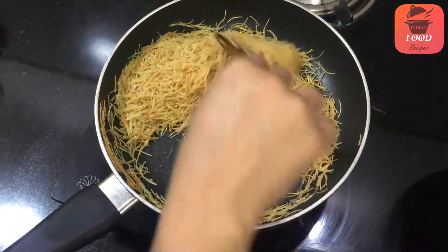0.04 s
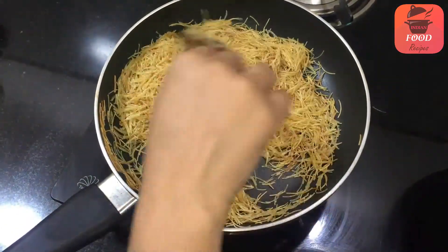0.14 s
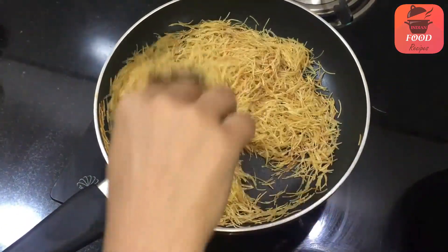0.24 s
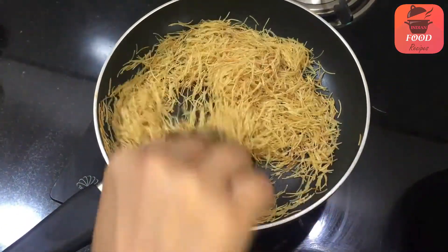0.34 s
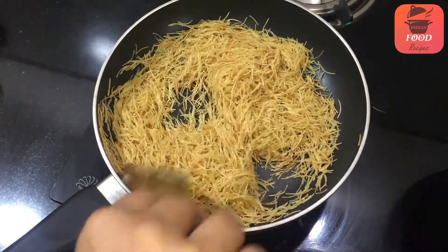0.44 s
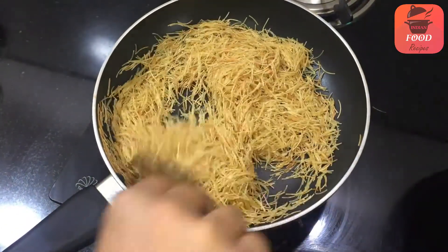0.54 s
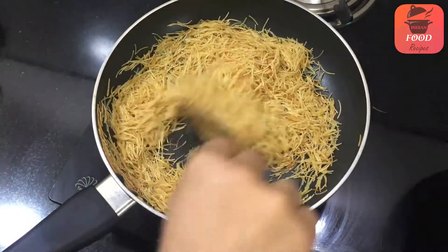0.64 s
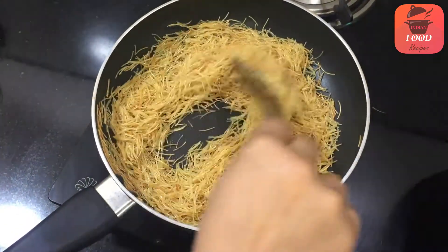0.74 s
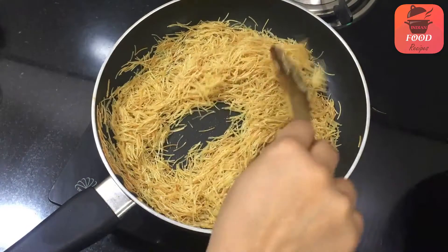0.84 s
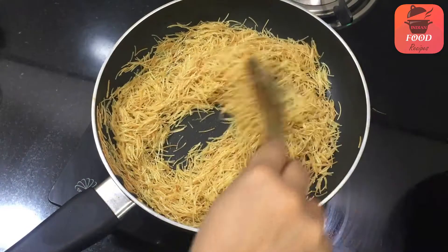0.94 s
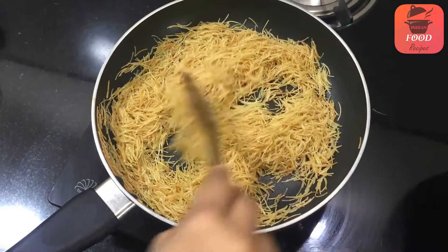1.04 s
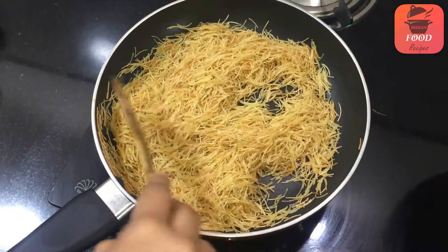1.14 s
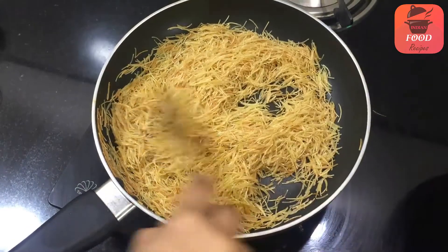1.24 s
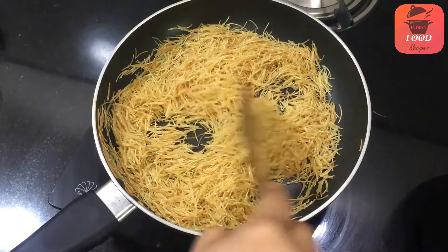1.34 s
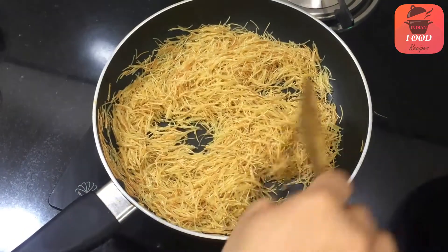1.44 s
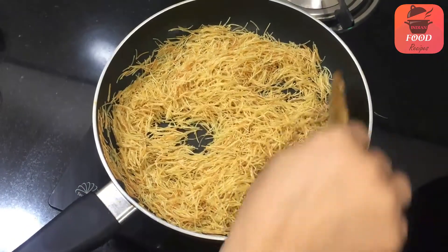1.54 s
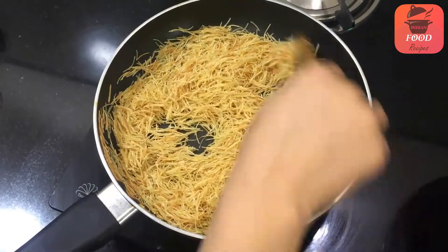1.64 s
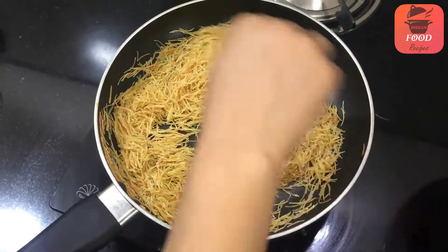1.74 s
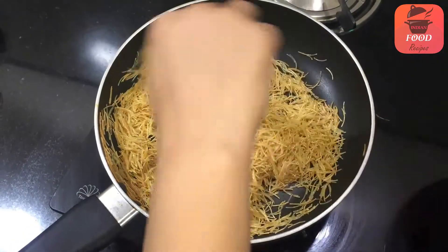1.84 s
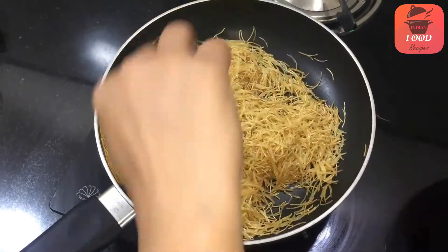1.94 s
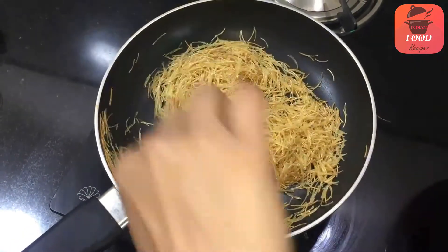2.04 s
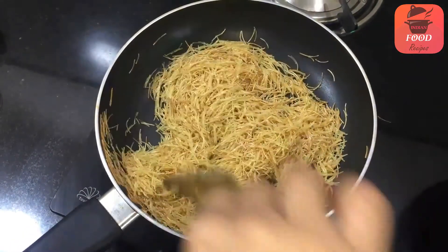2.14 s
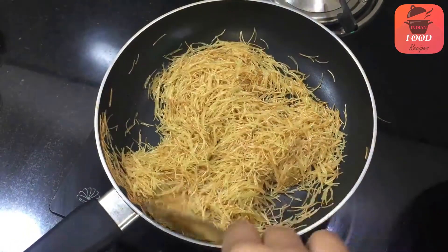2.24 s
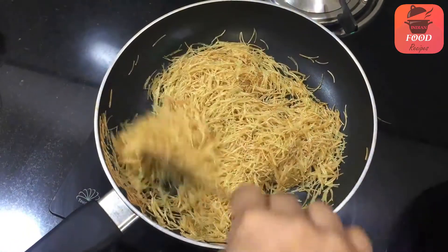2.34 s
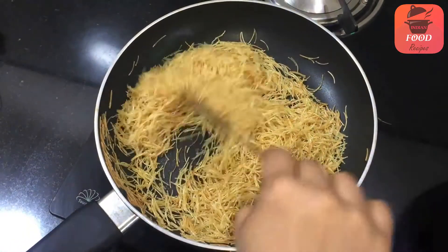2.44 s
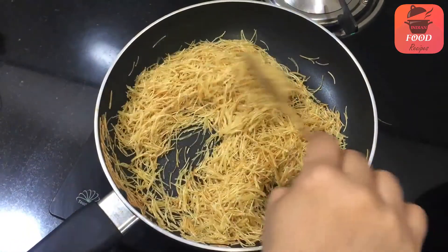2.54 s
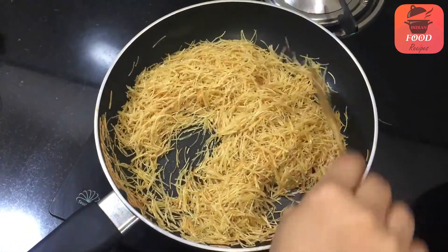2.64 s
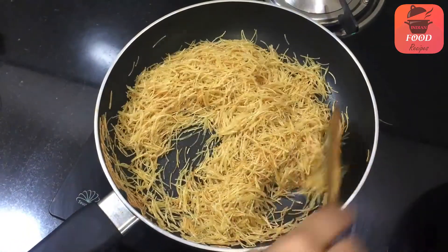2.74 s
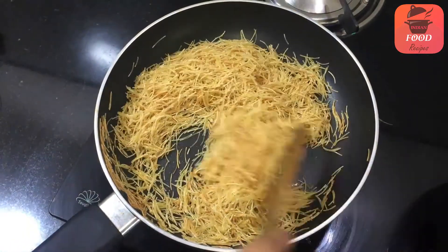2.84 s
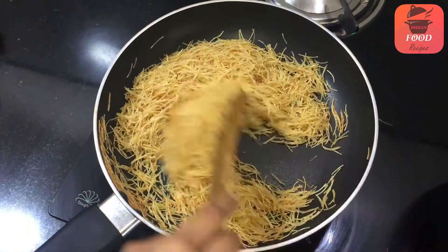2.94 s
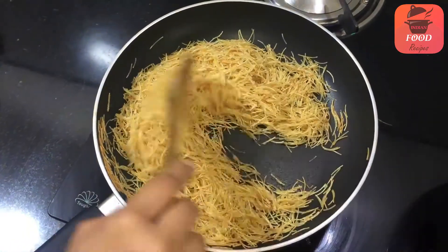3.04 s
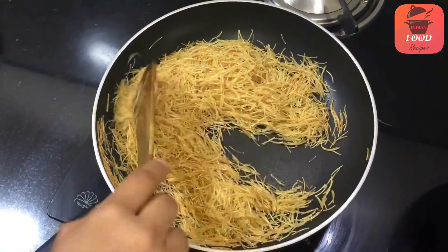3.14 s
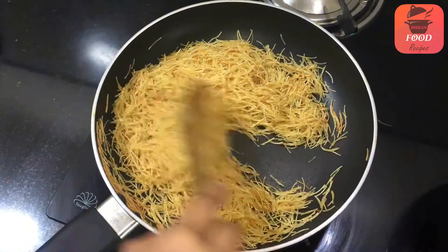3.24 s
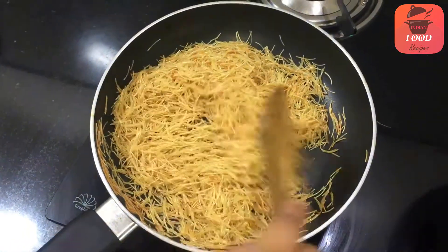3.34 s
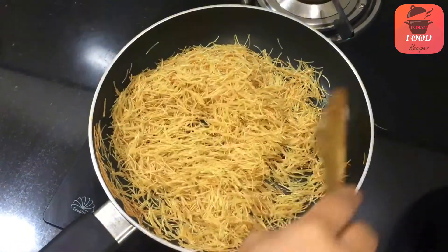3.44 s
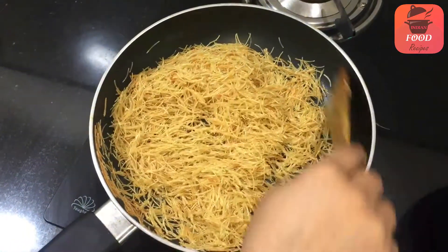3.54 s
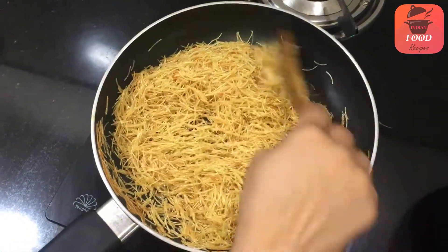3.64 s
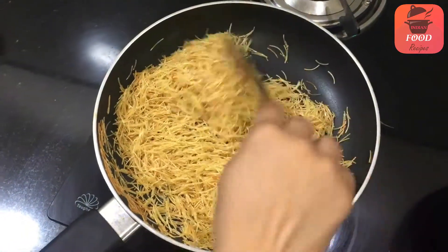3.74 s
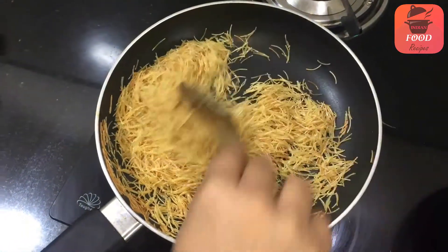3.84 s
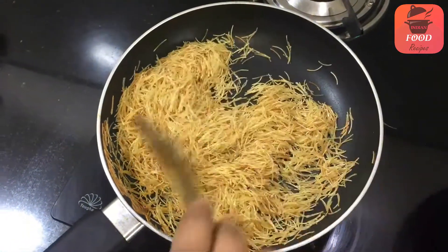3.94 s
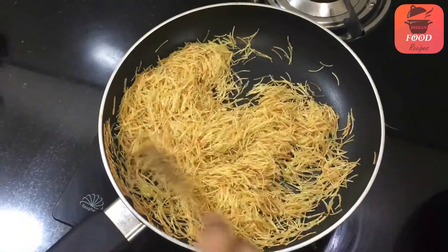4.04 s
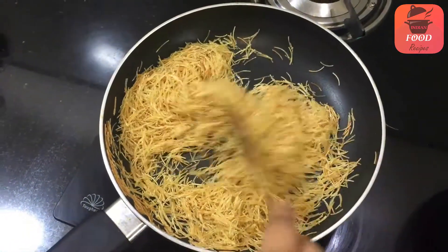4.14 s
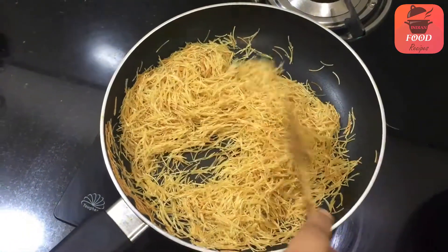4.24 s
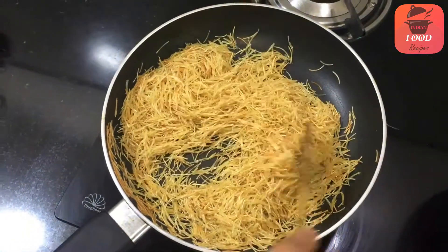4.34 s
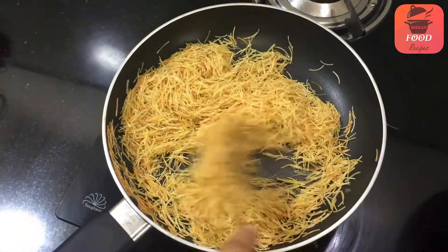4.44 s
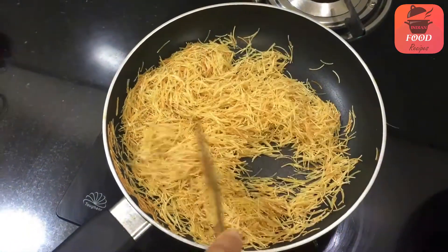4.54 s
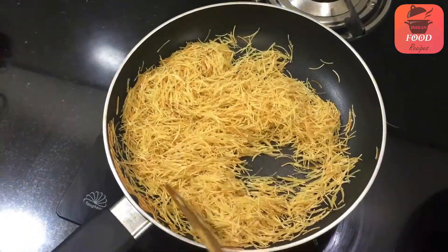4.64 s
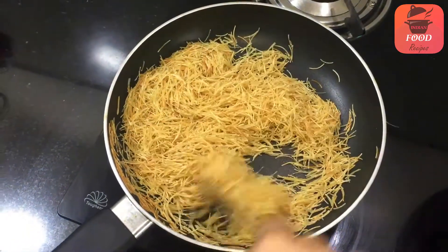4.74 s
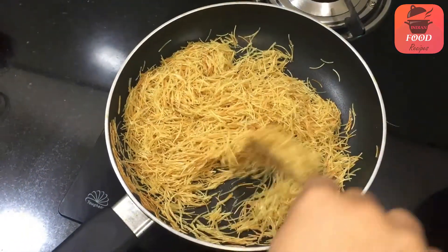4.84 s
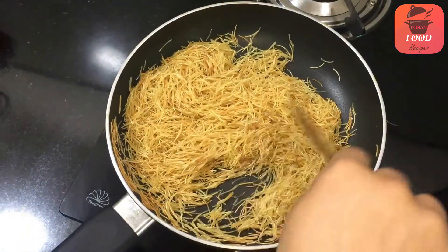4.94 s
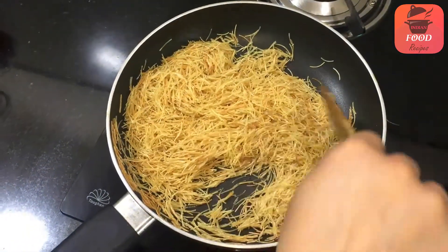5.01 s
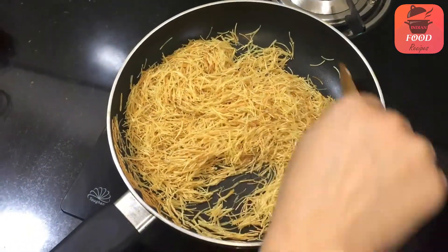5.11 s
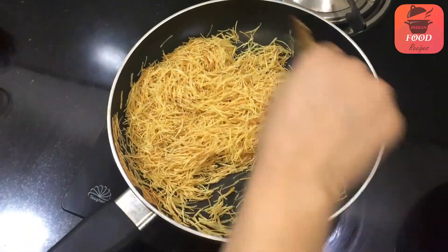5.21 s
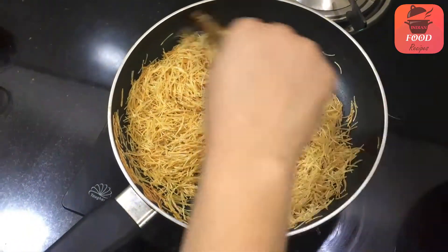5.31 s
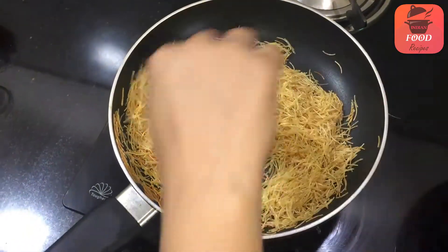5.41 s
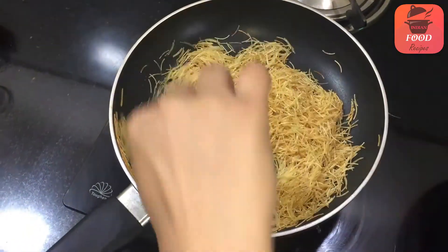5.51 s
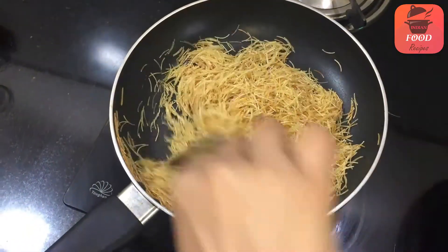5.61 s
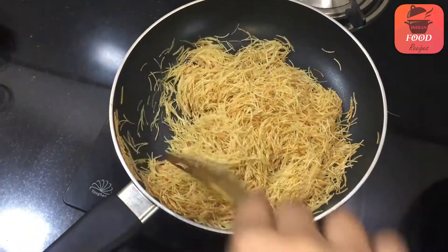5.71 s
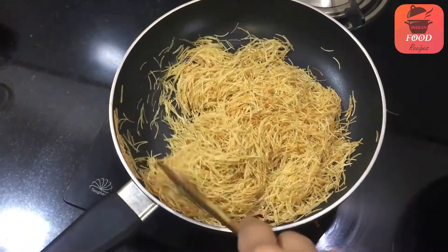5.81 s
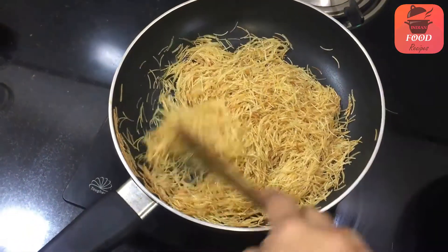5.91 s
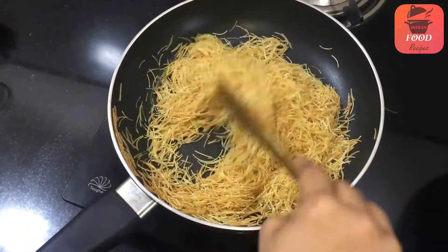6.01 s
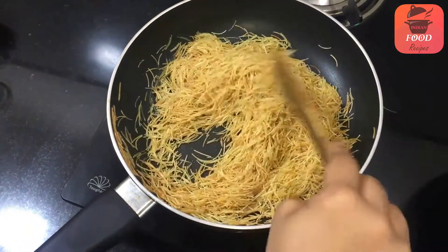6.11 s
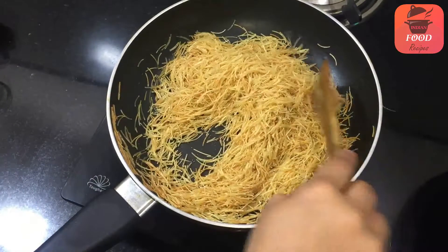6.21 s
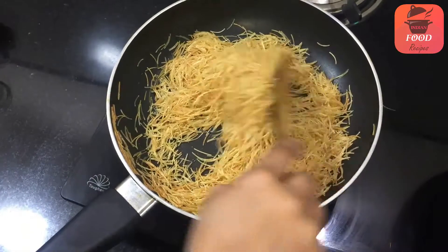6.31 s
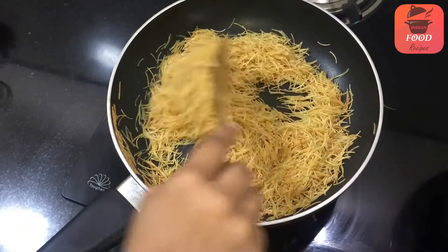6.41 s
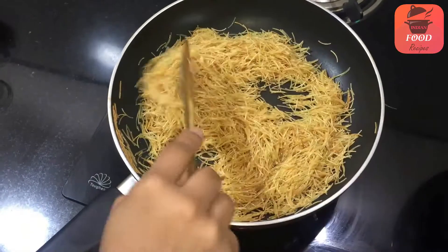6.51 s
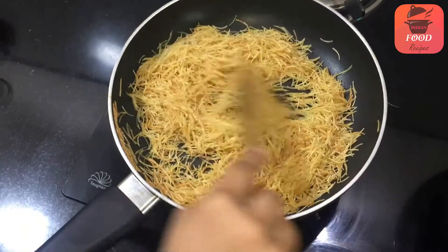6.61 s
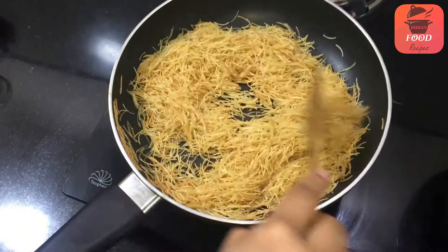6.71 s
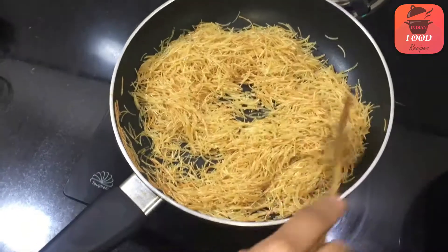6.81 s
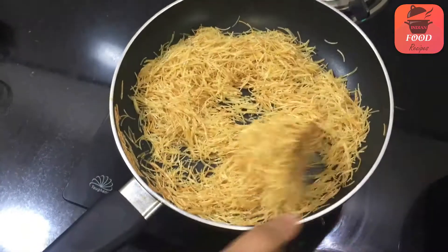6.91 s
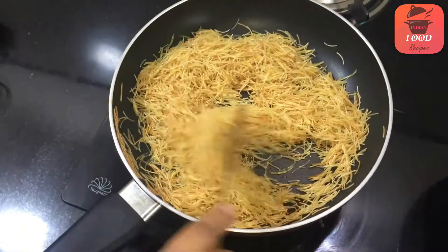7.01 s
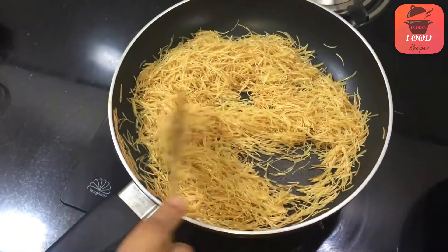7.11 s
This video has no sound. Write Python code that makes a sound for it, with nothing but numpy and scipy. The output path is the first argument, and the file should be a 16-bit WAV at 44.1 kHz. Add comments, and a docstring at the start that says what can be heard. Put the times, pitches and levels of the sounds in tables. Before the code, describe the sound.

A wooden spatula stirs dry, brittle strands in a metal pan with quick gritty scrapes, crisp rustles and occasional hollow knocks in a small kitchen.

```python
"""A faint scrape dies away, then strands crunch and a push swells: a wooden spatula stirs dry strands in a pan.
Each push filters random slips, snaps, skids and ticks through resonances of pan and blade; crunches are
bursts of snaps. Knocks excite decaying pan modes, with echoes and a rattle on the stand; rocking adds a thrum.
A short diffuse tail, steady air and a low uneven rumble place the nearly mono sound in a small kitchen."""
import sys
import numpy as np
from scipy import signal
from scipy.fft import rfft, irfft
from scipy.io import wavfile

SR = 44100
rng = np.random.default_rng(int(sys.argv[2]) if len(sys.argv) > 2 else 0)


def to_wav(sig):
    """Store sig (one row per channel, or 1-D mono) as 16-bit WAV at the path in sys.argv[1].

    Samples outside -1..1 are clipped; the rate is SR.
    """
    pcm = np.clip(np.atleast_2d(sig), -1, 1) * 32767
    pcm = np.round(pcm).astype(np.int16)
    wavfile.write(sys.argv[1], SR, pcm.T)  # frames by channels


N = 315756  # samples
TAPS = 8192  # length of the grid on which filters are designed
TIME = np.arange(N) / SR  # s
HZ = np.fft.rfftfreq(TAPS, 1 / SR)

# Spectrum of the steady kitchen air. Each row: frequency in Hz, gain in dB.
AIR_SPECTRUM = [(20, -19), (50, -10.5), (90, -2.5), (150, -14), (300, -5.5), (550, -19.5), (900, -10.5),
                (1400, -16), (1900, -26), (4000, -29), (8000, -27.5), (16000, -50)]
# Low rumble of the stove top. Each row: time in seconds, level in dB.
RUMBLE_LEVEL = [(0, -74), (0.6, -76), (0.8, -53), (1.7, -54.5), (2.2, -72), (4.0, -69), (4.6, -58),
                (5.2, -78), (5.8, -64), (6.05, -49.5), (6.35, -50.5), (6.7, -49.5), (7.16, -55)]
# Spectrum of that rumble. Each row: frequency in Hz, gain in dB.
RUMBLE_SPECTRUM = [(20, -40), (36, -19), (51, 8.5), (68, -3.5), (110, -19), (250, -42.5)]
# Decay of the kitchen's diffuse tail. Each row: frequency in Hz, time to -60 dB in seconds.
KITCHEN_DECAY = [(100, 0.34), (400, 0.42), (1500, 0.26), (5000, 0.14), (14000, 0.16)]
# Echoes from the stove top and the wall behind. Each row: mean delay in seconds, gain as a factor.
ECHOES = [(.0042, 0.49), (.0078, -0.27), (0.0126, .3), (.02, -0.1)]

# Bending modes of the pan. Each row: mean frequency in Hz, height over the dead thud in dB (before the
# ring setting of each knock), time to -60 dB in seconds.
PAN_MODES = [(194, 7.5, 0.23), (274, 16, .25), (320, 18, 0.25), (362.5, 9, 0.12), (405, 8.5, .11),
             (477, 17.5, 0.22), (519.5, 5, .12), (574, 11.5, 0.18), (652, 6.5, 0.09), (711, 12, 0.2),
             (731, 13, .22), (777, 6.5, 0.14), (876, 10.5, 0.14), (955, 5, 0.19), (1075, 3.5, 0.12),
             (1258, 4, 0.09), (1340, 7, .14), (1438, 6.5, 0.12), (1626, 4, 0.08), (1825, 5.5, 0.15),
             (2120, 5, 0.08), (2510, 5, 0.09), (2790, 5, .1)]
# Resonances of pan and blade under rubbing. Each row: frequency in Hz, width in Hz, lift in dB
# (each source takes its own share of the lift).
BODY_RESONANCES = [(272.5, 49, 7), (311, 34, 7.5), (734.5, 63, 7), (878, 55, 6.5), (948, 71, 7),
                   (1197, 25, -2), (1329, 85, 13), (1464, 93, 8), (1972, 30, 7.5), (2100, 55, 8.5),
                   (2760, 64, 5), (3170, 110, 9), (3480, 148, 9), (4184, 81, 8.5), (4555, 125, 12.5),
                   (5243, 77, 10.5), (5420, 126, 10), (5770, 110, 7.5), (6230, 200, 10), (6696, 110, 9),
                   (7510, 50, 7), (9250, 270, 5), (9760, 250, 1), (10380, 350, -7), (12400, 250, 0)]
# Resonances of the blade's thin edge flicking a strand. Each row: frequency in Hz, width in Hz, lift in dB.
EDGE_RESONANCES = [(6300, 300, 4), (7450, 260, 10), (8300, 600, -5), (9250, 380, 6), (10050, 500, -6),
                   (10800, 350, 9), (11600, 500, -4), (12350, 380, 7), (13750, 300, 7)]

# Pan rocking on its stand. Each row: start in seconds, level in dB, pitch in Hz, time to -60 dB in seconds.
SHUDDERS = [(0.62, -44, 480, .2), (0.675, -40, 240, .12), (0.717, -40.5, 150, .12), (1.029, -53, 213, .2),
            (1.138, -55, 223, .15), (1.35, -54, 300, .15), (1.76, -40, 322, .25), (1.87, -41, 300, .22),
            (1.925, -44, 320, .15), (2.37, -49, 328, .12), (2.433, -51, 315, .15), (2.51, -53, 293, .15),
            (2.79, -46, 285, .2), (2.86, -47, 221, .3), (3.776, -41, 328, .14), (3.88, -50, 285, .25),
            (4.05, -47, 268, .09), (4.135, -47, 258, .16), (4.17, -51, 165, .12), (4.21, -48, 277, .3),
            (4.473, -43, 272, .2), (4.54, -42, 323, .22), (4.86, -52, 270, .15), (5.31, -45, 195, .3),
            (5.45, -43, 110, .25), (5.57, -44, 288, .2), (5.705, -50, 266, .2), (6.02, -53, 285, .2),
            (6.38, -43, 275, .13), (6.442, -50, 304, .13), (6.515, -52, 296, .13), (6.735, -38.5, 250, .18),
            (6.795, -45, 160, .25), (6.95, -46, 200, .3), (7.025, -46, 320, .16), (7.1, -44, 266, .25)]
# Broad spectrum of the rocking. Each row: frequency in Hz, gain in dB.
SHUDDER_SPECTRUM = [(50, -12), (100, -0.5), (160, -4), (270, 0), (370, -5), (520, -13), (900, -32),
                    (2000, -59)]
SHUDDER_RISE_S = .008  # time constant of the build-up
SHUDDER_LIFT_DB, SHUDDER_HALF_WIDTH_HZ = 8, 30  # prominence of each shudder's main note

# Blade against pan. Each row: start in seconds, level in dB, lowest frequency in Hz, highest frequency in Hz,
# steepness of the cut above it as a power, pitch of the wooden tock in Hz, pan note favoured by the spot
# struck in Hz, lift of that note in dB, rattle in dB, ring of the pan's modes in dB.
KNOCKS = [(0.5924, -33.5, 400, 2200, 4.5, 1330, 300, 7, 5, -1),
          (0.614, -40, 620, 1400, 6, 900, 275, 2, 0, 0),
          (0.680, -30.5, 755, 2300, 5.8, 1300, 300, 0, 3, -3),
          (0.697, -33, 700, 2500, 8, 2100, 878, 3, 0, -2), (0.709, -32, 750, 1200, 8, 920, 950, 3, -3, 0),
          (0.704, -43.5, 110, 216, 5.8, 159, 159, 0, 0, 0),
          (1.6924, -17.8, 250, 1900, 5.5, 725, 322, 2.5, -4, 0.5),
          (1.7145, -29, 300, 1700, 5, 600, 477, 3, -3, 2), (1.726, -28.5, 250, 1600, 5, 850, 322, 4, 5, 1),
          (1.746, -32, 260, 1500, 5, 480, 322, 4, 2, 2), (1.763, -34, 500, 1400, 6, 800, 714, 4, 0, 3),
          (1.799, -26, 210, 900, 5, 275, 275, 5, 3, 1), (1.816, -28.5, 220, 1350, 5, 760, 322, 4, 3, 2),
          (1.842, -36, 260, 1300, 6, 650, 275, 3, 2, 2), (1.866, -35, 300, 1300, 5, 711, 714, 3, 3, 2),
          (2.350, -48, 223, 1550, 12, 1350, 330, 6, 0, 0), (2.783, -36, 200, 1200, 14, 720, 285, 3, 0, 1),
          (2.812, -37.2, 260, 1000, 14, 770, 322, 3, -2, 2),
          (2.838, -44.5, 260, 1050, 14, 880, 285, 0, -3, 0),
          (2.9738, -22.3, 640, 2300, 5.8, 800, 480, 2, -9, 0),
          (2.9825, -28, 636, 2100, 5.8, 840, 320, 0, 9, 0),
          (3.022, -36, 450, 1200, 5.8, 724, 275, 3, -6, 0), (3.642, -26, 330, 1400, 6.5, 800, 477, 3, 1, 1),
          (3.6535, -30, 360, 1100, 6, 450, 322, 5, -3, 2), (3.690, -33, 340, 1200, 5.8, 480, 477, 4, 1, 3),
          (3.719, -35, 350, 1100, 5.8, 350, 322, 5, -1, 3), (3.752, -39.5, 480, 1600, 5, 740, 731, 3, 0, 2),
          (4.122, -42, 900, 3300, 5, 1400, 1340, 2, 4, 0), (4.467, -44, 220, 910, 8, 327, 272, 3, 4, 0),
          (4.7741, -36.5, 280, 1480, 20, 1380, 270, 3, -1, 1),
          (4.797, -41.5, 280, 950, 14, 680, 270, 2, 0, 1),
          (5.2552, -20.3, 380, 1700, 4.8, 1180, 730, 4, -7, 1),
          (5.286, -35, 170, 1500, 8, 700, 200, 4, 3, 2), (5.311, -39, 250, 1400, 8, 700, 275, 3, 0, 2),
          (5.408, -29, 740, 1800, 16, 1390, 1830, 4, 2, 1),
          (5.4175, -30, 640, 1750, 16, 750, 575, 3, -3, 1), (5.442, -25, 280, 1800, 14, 960, 400, 1, -3, 0),
          (5.467, -34, 300, 1400, 7, 660, 477, 3, 0, 2), (5.508, -34, 280, 1100, 6, 500, 365, 3, 3, 2),
          (5.548, -35, 330, 1100, 6, 660, 714, 3, 2, 2), (5.572, -39, 350, 1200, 8, 900, 477, 3, 0, 2),
          (6.743, -33.5, 760, 1450, 8, 1200, 730, 7, 8, -3)]
# Broad spectrum of a blow. Each row: frequency in Hz, gain in dB.
BLOW_SPECTRUM = [(80, -5), (250, 0), (400, -1.5), (560, -4.5), (720, -1), (1250, 0), (2400, 1.5), (3300, 0),
                 (6000, -16), (16000, -20)]
RATTLE_PER_S = 560  # tiny bounces of the pan on its stand
RATTLE_T60_S, FAINT_RATTLE_T60_S = .09, .38  # main rattle and its faint, longer remainder
NOTE_HALF_WIDTH_HZ = 28  # of the pan note that a knock favours

# The blade landing in the heap and snapping strands. Each row: loudest moment in seconds, level in dB,
# fall time to -60 dB in seconds, brightness in dB per octave (above 3 kHz).
CRUNCHES = [(0.145, -37.0, 0.17, -0.2), (0.569, -47.7, 0.04, -3.8), (0.593, -33, 0.05, -3),
            (0.68, -29, 0.09, -3), (0.964, -32.8, 0.19, -2.5), (1.15, -36.3, 0.17, -8.3),
            (1.2925, -31, 0.05, 0.5), (1.305, -33, 0.17, 0.5), (1.693, -38, 0.06, 0),
            (1.725, -40, 0.25, 0.8), (2.347, -36.6, 0.15, -7.1), (2.699, -37.3, 0.18, 3),
            (2.783, -30, 0.1, -2), (3.182, -47, 0.08, 8), (3.228, -37.5, 0.17, 5),
            (4.124, -30.2, 0.11, -4.1), (4.304, -40, 0.06, -5), (4.338, -30.5, 0.11, -9),
            (4.447, -42.5, 0.12, -0.9), (5.257, -41.0, 0.07, -13.5), (5.324, -40.4, 0.04, 8.0),
            (5.362, -33.5, 0.2, 12.0), (5.385, -26.2, 0.11, 11.0), (5.472, -33.9, 0.04, 11.0),
            (6.272, -33.3, 0.05, 2.5), (6.292, -35.5, 0.04, 3), (6.596, -45, 0.2, 4), (6.611, -42, 0.14, 6),
            (6.638, -42, 0.16, 6), (6.686, -33, 0.1, -0.9), (6.834, -32, 0.07, 3.5), (6.852, -43, 0.05, 3),
            (6.877, -40.9, 0.07, 7.1)]
# Broad spectrum of a crunch. Each row: frequency in Hz, gain in dB.
CRUNCH_SPECTRUM = [(500, -33), (1300, -10.5), (1900, -33), (3700, -15), (5200, -3), (8000, 1), (12000, -1),
                   (14000, -3), (15500, -12)]
BUILD_DB = 290  # rise per fall time: short snaps start crisply, long crunches softly

# Pushes of the blade through the heap. Each row: blade down in seconds, fastest moment in seconds, scrape rise
# in seconds, rustle rise in seconds, fall in seconds, scrape gain in dB, hollowness as low scrape over middle
# in dB, grit as extra gain on the upper scrape in dB, rustle gain in dB. Gains precede the mix in stirring().
STROKES = [(0.0, 0.0, 0.09, 0.12, 0.13, -43.1, 0, -3.2, -48),
           (0.14, 0.403, 0.13, 0.22, 0.109, -30.9, 2, 3.5, -31.7),
           (0.595, 0.696, 0.06, 0.112, 0.058, -30.2, 2, 6, -29.6),
           (0.69, 0.765, 0.104, 0.064, 0.115, -35, 0, 4.6, -35.4),
           (0.961, 1.091, 0.07, 0.072, 0.076, -29.2, -2, 1, -33.5),
           (1.11, 1.148, 0.09, 0.114, 0.106, -41.2, 0, 4.4, -43.6),
           (1.293, 1.374, 0.052, 0.07, 0.118, -33, 3, -0.5, -35.4),
           (1.702, 1.91, 0.42, 0.36, 0.113, -42, 1, 9.2, -37.0),
           (1.958, 2.112, 0.13, 0.194, 0.102, -39.6, 2, 9, -35.7),
           (2.351, 2.498, 0.163, 0.24, 0.133, -32.9, 1, 4.9, -33.4),
           (2.783, 2.986, 0.095, 0.26, 0.14, -29.7, 3, 2.6, -34),
           (3.23, 3.365, 0.06, 0.085, 0.15, -32.2, 0, 1.2, -35),
           (3.409, 3.473, 0.106, 0.107, 0.099, -45.4, 5, 6.5, -40),
           (3.643, 3.755, 0.153, 0.17, 0.138, -35.3, 0, 2, -37.3),
           (3.801, 3.905, 0.125, 0.15, 0.125, -28.8, 0, 0.2, -36.1),
           (4.12, 4.203, 0.038, 0.065, 0.131, -27.4, -4, 3.6, -31),
           (4.251, 4.315, 0.112, 0.054, 0.116, -37, -4, -3, -41),
           (4.454, 4.536, 0.129, 0.124, 0.111, -31.3, 0, 2.2, -33.6),
           (4.775, 4.875, 0.047, 0.07, 0.14, -30.6, -7, 2.4, -34.3),
           (5.292, 5.41, 0.17, 0.116, 0.06, -37.2, 3, 5, -35.0),
           (5.445, 5.513, 0.157, 0.125, 0.236, -36.4, 4, 4.5, -38),
           (5.558, 5.707, 0.212, 0.329, 0.088, -33.3, -4, 3.5, -34.6),
           (5.9, 6.04, 0.07, 0.115, 0.15, -31.8, -3, 3, -34.1),
           (6.1, 6.169, 0.091, 0.114, 0.05, -38.0, -4, -8.8, -49.3),
           (6.274, 6.425, 0.078, 0.19, 0.125, -32.5, -4, -1, -35),
           (6.48, 6.535, 0.096, 0.108, 0.13, -49, -1, -3, -45.5),
           (6.625, 6.725, 0.062, 0.107, 0.1, -28.8, 3, -4.5, -32),
           (6.9, 6.972, 0.06, 0.062, 0.09, -46, -2, -3, -40),
           (6.99, 7.08, 0.105, 0.14, 0.107, -30.2, -3, -4.8, -35)]
# Broad spectrum of the scrape. Each row: frequency in Hz, gain in dB.
SCRAPE_SPECTRUM = [(300, -35), (580, -32.5), (760, 0.5), (1700, -1.5), (2500, -5), (3900, -8.5),
                   (5500, -10.5), (9000, -17), (16000, -40)]
# Broad spectrum of the rustle. Each row: frequency in Hz, gain in dB.
RUSTLE_SPECTRUM = [(1500, -54), (3600, -25.5), (4900, -2.5), (6000, -1), (7500, -1), (9500, -1),
                   (11500, -3), (13500, -5.2), (15500, -21)]
SWELL_DB = 20.1  # fall of a swell one rise time before, or one fall time after, its fastest moment
SWELL_TAIL = .88  # smaller values make a push die away more completely between strokes
LEAD_S = .01  # grit and rustle peak just before the scrape, as the blade meets the heap first
SINK_DB_PER_S = 1100  # growth as the blade sinks into the heap, until it is down
GRIT_POWER = 1.2  # grit follows the speed more steeply than the scrape
SCRATCH_DB, SCRATCHES_PER_S = -7.5, 330  # single strands skidding under the blade, level against the grit
SCRATCH_S, SCRATCH_GLIDE = .0011, .03  # typical rise time, largest share of pitch slid in one rise time
TICK_DB, TICKS_PER_S, TICK_T60_S = -8, 220, .055  # strands springing free, level against the grit, mean decay
TICK_LOW_HZ, TICK_HIGH_HZ = 1700, 6800  # the longest and the shortest of them


def amp(db):
    """Definition of the decibel: level to amplitude ratio."""
    return 10 ** (np.asarray(db) / 20)


def unit(x):
    """Normalisation to an rms of one."""
    return x / np.sqrt(np.mean(x ** 2) + 1e-20)


def read(points, hz=HZ):
    """Linear interpolation of a spectrum on a log-frequency axis."""
    f, value = np.transpose(points)
    return np.interp(np.log(hz + 1), np.log(f + 1), value)


def curves(rows):
    """Linear interpolation in time of each column of a table."""
    s, *columns = np.transpose(rows)
    return [np.interp(TIME, s, c) for c in columns]


def add(mix, s, sound):
    """Superposition: a sound joins the mix at time s."""
    part = mix[round(s * SR):][:len(sound)]
    part += sound[:len(part)]


def colour(x, db):
    """Minimum-phase filtering with dB gains on HZ: the filter rings after each click, never before."""
    log_gain = np.log(amp(np.maximum(db, db.max() - 90)))
    circle = np.concatenate([log_gain, log_gain[-2:0:-1]])
    # the Hilbert transform of the log gain gives the minimum phase
    spectrum = np.exp(np.conj(signal.hilbert(circle)))
    response = np.fft.ifft(spectrum).real
    return signal.oaconvolve(x, response[:TAPS // 2])[:len(x)]


def below(x, hz):
    """Zero-phase low-pass filtering: the part of a sound under the given frequency."""
    return signal.sosfiltfilt(signal.butter(2, hz, fs=SR, output="sos"), x)


def lift(resonances):
    """Resonance: a sum of bell-shaped dB lifts given to whatever drives the body."""
    return sum(db / (1 + (2 * (HZ - hz) / width) ** 2) for hz, width, db in resonances)


def body():
    """Forced resonance: the dB lift that pan and blade give to whatever rubs on them."""
    return lift(BODY_RESONANCES)


def wander(rate_hz):
    """Band-limited randomness: slow noise of unit rms, with a soft limit at the given rate."""
    f = np.fft.rfftfreq(N, 1 / SR)
    return unit(irfft(rfft(rng.standard_normal(N)) * np.exp(-(f / rate_hz) ** 2), N))


def clicks(per_s, spread_db, size):
    """Shot noise: random tiny snaps, many small and a few large."""
    height_db = spread_db * np.minimum(rng.exponential(1, size), 4)
    height = amp(height_db) * rng.choice([-1, 1], size)
    return unit(height * (rng.random(size) < per_s / SR))


def roam(x, depth_db, patch_hz, patch_s):
    """Varying modal coupling: as the blade travels it favours now some resonances, now others."""
    _, _, z = signal.stft(x, SR, nperseg=1024, noverlap=768)
    across_hz = np.fft.fftfreq(z.shape[0], SR / 1024)[:, None] * patch_hz
    across_s = np.fft.fftfreq(z.shape[1], 256 / SR) * patch_s
    # noise smoothed in both directions makes patches in time and frequency
    smoothing = np.exp(-(2 * across_hz) ** 2 - (2 * across_s) ** 2)
    patches = np.fft.ifft2(np.fft.fft2(rng.standard_normal(z.shape)) * smoothing)
    varied = z * amp(depth_db * unit(patches.real))
    return unit(signal.istft(varied, SR, nperseg=1024, noverlap=768)[1][:N])


def background():
    """Stationary noise and slow modulation: steady kitchen air under a low, uneven rumble."""
    air = unit(colour(rng.standard_normal(N), read(AIR_SPECTRUM))) * amp(-62.7)
    rumble = unit(colour(rng.standard_normal(N), read(RUMBLE_SPECTRUM)))
    return air + rumble * amp(curves(RUMBLE_LEVEL)[0])


def kitchen(x):
    """Diffuse reverberation: a short noise tail, each band decaying at its own rate."""
    hz, t, z = signal.stft(rng.standard_normal(SR * 2 // 3), SR, nperseg=256)
    decay = amp(-60 * t / read(KITCHEN_DECAY, hz)[:, None])
    tail = signal.istft(z * decay, SR, nperseg=256)[1]
    tail *= 1 - np.exp(-(np.arange(len(tail)) / SR / 0.0042) ** 2)  # soft onset over some 4 ms
    return signal.fftconvolve(x, tail / np.linalg.norm(tail))[:N]


def thrum():
    """Forced vibration: each time the pan rocks, a dying chatter on the stand shakes its low modes."""
    out, t = np.zeros(N), np.arange(SR // 2) / SR
    pan_db = read(SHUDDER_SPECTRUM) + body()
    for s, db, pitch_hz, t60 in SHUDDERS:
        chatter = clicks(per_s=900, spread_db=2.0, size=len(t))
        chatter *= amp(-60 * t / max(t60, .04)) * (1 - np.exp(-t / SHUDDER_RISE_S))
        pitch_db = SHUDDER_LIFT_DB / (1 + ((HZ - pitch_hz) / SHUDDER_HALF_WIDTH_HZ) ** 2)
        shake = colour(chatter, pan_db + pitch_db)
        add(out, s, amp(db) * shake / np.std(shake[:SR // 25]))  # level set over the first 40 ms
    return out


def pan_response(t, ring_db):
    """Modal impulse response: a dead thud plus damped modes, each detuned a little by the resting blade."""
    out = np.zeros(len(t))
    out[0] = 1
    for hz, db, t60 in PAN_MODES:
        damping = np.log(1000) / t60
        turns = hz * (1 + .004 * rng.standard_normal()) * t
        ring = np.exp(-damping * t) * np.cos(2 * np.pi * turns)
        out += amp(db + ring_db) * 2 * damping / SR * ring
    return out


def knocks():
    """Impact excitation: a wooden blow, its echoes and a dying rattle on the stand set the pan ringing."""
    out, t = np.zeros(N), np.arange(SR // 2) / SR
    rattle_fall = amp(-60 * t / RATTLE_T60_S) + 0.14 * amp(-60 * t / FAINT_RATTLE_T60_S)
    for s, db, low_hz, high_hz, steepness, tock_hz, note_hz, note_db, rattle_db, ring_db in KNOCKS:
        blow = np.zeros(len(t))
        for delay, gain in [(0.0007, 1)] + ECHOES:  # the direct blow comes first
            blow[round(abs(delay) * SR * rng.uniform(.9, 1.1))] += gain
        rattle = clicks(per_s=RATTLE_PER_S, spread_db=1.5, size=len(t)) * rattle_fall
        blow += amp(rattle_db) * rattle / np.linalg.norm(rattle)

        low_cut, high_cut = 1 + (low_hz / (HZ + 1)) ** 5, 1 + (HZ / high_hz) ** steepness
        contact_db = -10 * np.log10(low_cut * high_cut)
        tock_lift_db = 7 / (1 + ((HZ / tock_hz - 1) / 0.12) ** 2)
        note_lift_db = note_db / (1 + ((HZ - note_hz) / NOTE_HALF_WIDTH_HZ) ** 2)
        ringing = signal.fftconvolve(blow, pan_response(t, ring_db))[:len(t)]
        sound = colour(ringing, read(BLOW_SPECTRUM) + contact_db + tock_lift_db + note_lift_db)
        # bending waves disperse: the low notes reach the rim a little after the high ones
        dispersion = np.exp(-1j * .3 * np.sqrt(np.fft.rfftfreq(len(t), 1 / SR)))
        sound = irfft(rfft(sound) * dispersion, len(t))
        add(out, s, amp(db) * sound / np.std(sound[:SR // 25]))  # level set over the first 40 ms
    return out


def crunches():
    """Clustered fracture: breaking strands build up fast, ring the blade's edge and thin out quickly."""
    lead = SR // 30  # samples of build-up
    out, t = np.zeros(N), np.arange(-lead, SR // 4) / SR
    lift_db = 1.1 * body() + lift(EDGE_RESONANCES)
    octaves = np.log2(np.maximum(HZ, 3000) / 8000)
    for s, db, t60, tilt in CRUNCHES:
        # the topmost strands give way first
        shape_db = np.where(t < 0, BUILD_DB, -60) * t / max(t60, .03)
        snaps = clicks(per_s=3200, spread_db=1.9, size=len(t)) * amp(shape_db)
        # a few stiff strands ping, each at its own pitch
        pings_db = sum(8 / (1 + ((HZ - hz) / 90) ** 2) for hz in rng.uniform(4590, 14500, 7))
        burst = colour(snaps, read(CRUNCH_SPECTRUM) + lift_db + pings_db + tilt * octaves)
        add(out, s + t[0], amp(db) * burst / np.std(burst[lead:][:SR // 100]))  # level over 10 ms after the peak
    return out


def swell(t, rise_s, fall_s):
    """Speed-dependent friction: gain at time t from the fastest moment, as the hand speeds up, then slows."""
    from_top = t / np.where(t < 0, rise_s, fall_s)
    return amp(-SWELL_DB * np.log1p(SWELL_TAIL * from_top ** 2) / np.log1p(SWELL_TAIL))


def pushes():
    """Power addition of strokes: gains of hollow tone, scrape, grit and rustle once the blade is down."""
    t, power = TIME[::64], 0  # gains vary slowly, so a coarse time grid is enough
    for down_s, top_s, rise_s, rustle_rise_s, fall_s, scrape_db, hollow_db, grit_db, rustle_db in STROKES:
        contact = amp(SINK_DB_PER_S * np.minimum(t - down_s, 0))
        scrape = amp(scrape_db) * swell(t - top_s, rise_s, fall_s)
        hollow, middle = scrape * amp(hollow_db / 2), scrape * amp(-hollow_db / 2)
        grit = amp(scrape_db + grit_db) * swell(t - top_s + LEAD_S, rise_s, fall_s) ** GRIT_POWER
        rustle = amp(rustle_db) * swell(t - top_s + LEAD_S, rustle_rise_s, fall_s)
        power = power + (contact * np.array([hollow, middle, grit, rustle])) ** 2
    return [np.interp(TIME, t, np.sqrt(p)) for p in power]


def scratches(count=40):
    """Frictional chirps: single strands skid under the blade, briefly and roughly, each at its own pitch."""
    out, t = np.zeros(N), np.arange(SR // 30) / SR
    for hz in np.geomspace(1600, 12000, count):
        age = t / (SCRATCH_S * rng.uniform(.5, 2))
        glide = SCRATCH_GLIDE * rng.uniform(-1, 1) * age
        roughness = .15 * rng.standard_normal(len(t))
        pitch = hz * (1 + glide + roughness)
        chirp = age * np.exp(-age) * np.sin(2 * np.pi * np.cumsum(pitch) / SR)
        for s, size in rng.random((round(SCRATCHES_PER_S * TIME[-1] / count), 2)):
            add(out, s * TIME[-1], amp(-12 * size) * chirp)
    return unit(colour(out, 0.9 * body()))


def ticks():
    """Free damped vibration: stiff strands spring free, each ticking briefly at its own pitch."""
    out, t = np.zeros(N), np.arange(SR // 12) / SR
    for when, size, pitch, length in rng.random((round(TICKS_PER_S * TIME[-1]), 4)):
        hz = TICK_LOW_HZ * (TICK_HIGH_HZ / TICK_LOW_HZ) ** pitch
        decay_db = -60 * t / (TICK_T60_S * (.5 + length))
        add(out, when * TIME[-1], amp(-12 * size + decay_db) * np.sin(2 * np.pi * hz * t))
    return unit(colour(out, 1.1 * body()))


def stirring():
    """Stick-slip friction: strands drag in tiny slips, scratches and ticks, while the heap rustles ahead."""
    hollow_gain, scrape_gain, grit_gain, rustle_gain = pushes()
    judder_db = wander(rate_hz=23)  # the blade catches and frees itself
    slips = clicks(per_s=2800, spread_db=2.7, size=N) * amp(judder_db)
    rub = colour(slips, read(SCRAPE_SPECTRUM) + 1.2 * body())
    rub = roam(rub, depth_db=3.8, patch_hz=100, patch_s=0.06)

    low, hollow = below(rub, hz=2500), below(rub, hz=1100)
    upper = rub - low
    scrape = hollow * hollow_gain + (low - hollow) * scrape_gain
    grit = unit(upper) + amp(SCRATCH_DB) * scratches() + amp(TICK_DB) * ticks()
    grit *= amp(-0.4) * np.std(upper)

    snaps = clicks(per_s=6000, spread_db=2.3, size=N) * amp(0.97 * judder_db)
    rustle = colour(snaps, read(RUSTLE_SPECTRUM) + 0.85 * body())
    rustle = roam(rustle, depth_db=4.0, patch_hz=160, patch_s=0.038)
    return scrape + grit * grit_gain + amp(-1.1) * rustle * rustle_gain


def scene():
    """Interaural coherence: the pan lies straight ahead; only the background differs between the ears."""
    rubbing, blows = stirring() + crunches() + thrum(), knocks()
    reverberation = kitchen(amp(-17.5) * rubbing + amp(-13) * blows)
    mono = rubbing + blows + reverberation + background()
    side = amp(-20) * background()
    return np.array([mono + side, mono - side])


def record(dry):
    """Band limitation: a linear-phase low-pass filter at 15.9 kHz."""
    low_pass = signal.firwin(511, 15900, window=("kaiser", 9), fs=SR)
    return signal.oaconvolve(dry, low_pass[None], "same")


dry = scene()
out = record(dry)
to_wav(out)
```